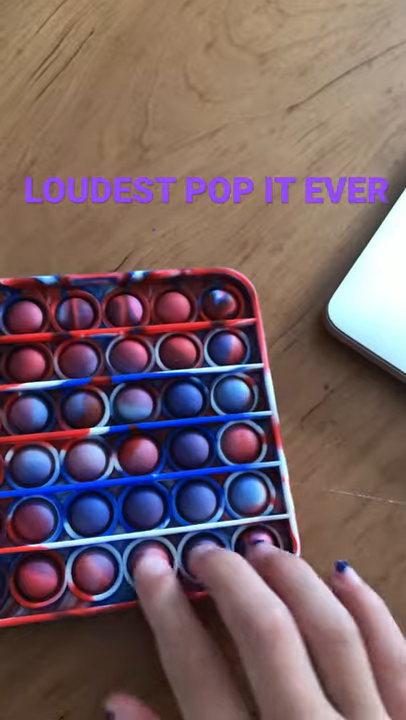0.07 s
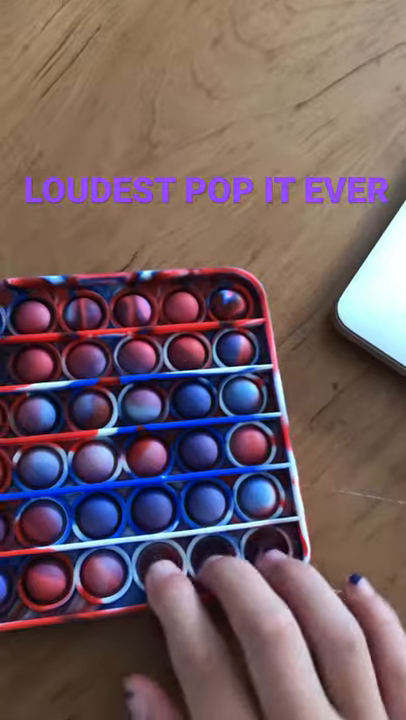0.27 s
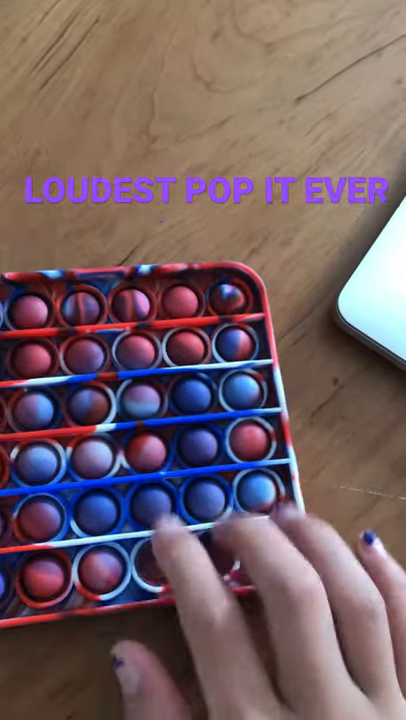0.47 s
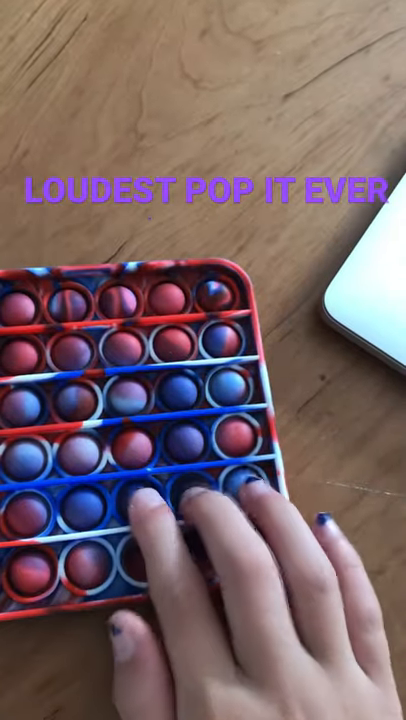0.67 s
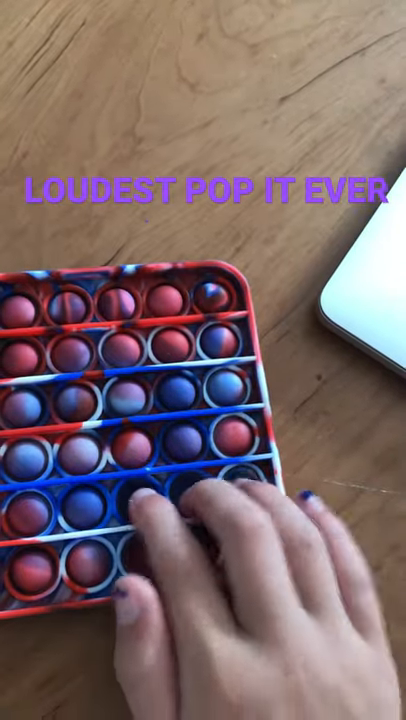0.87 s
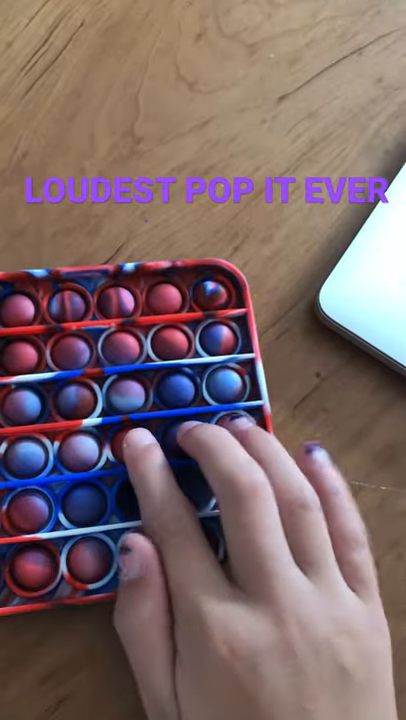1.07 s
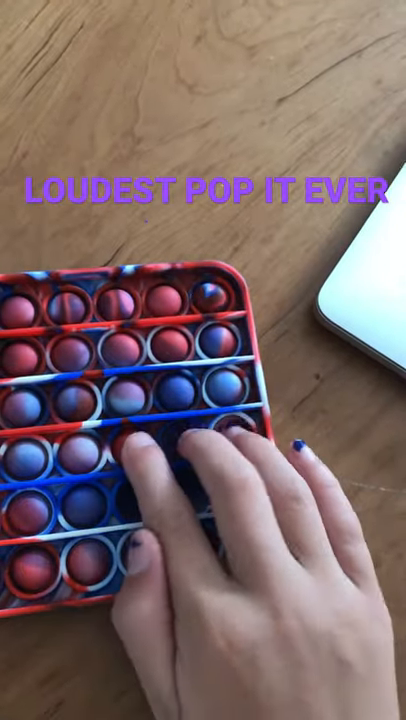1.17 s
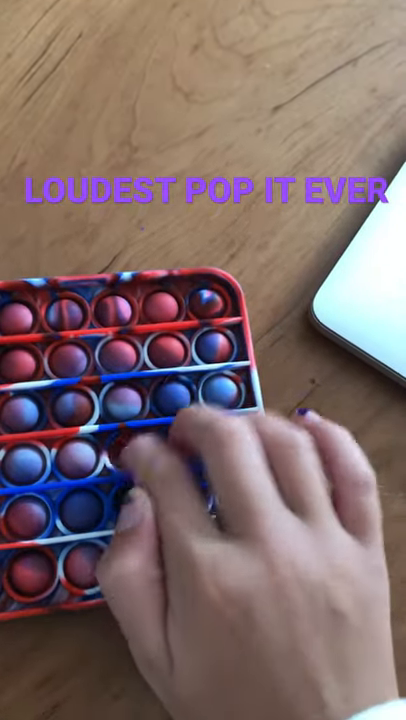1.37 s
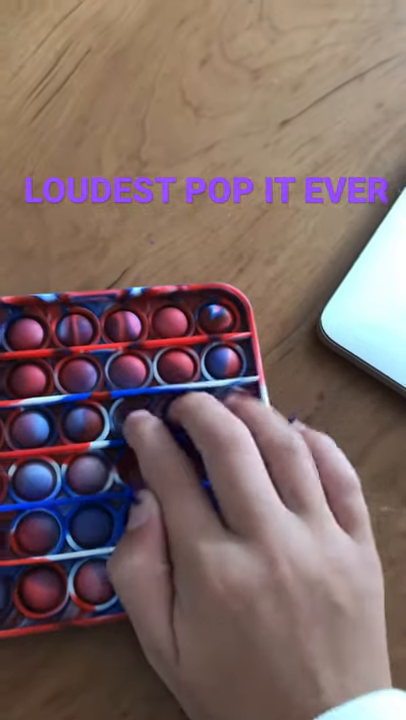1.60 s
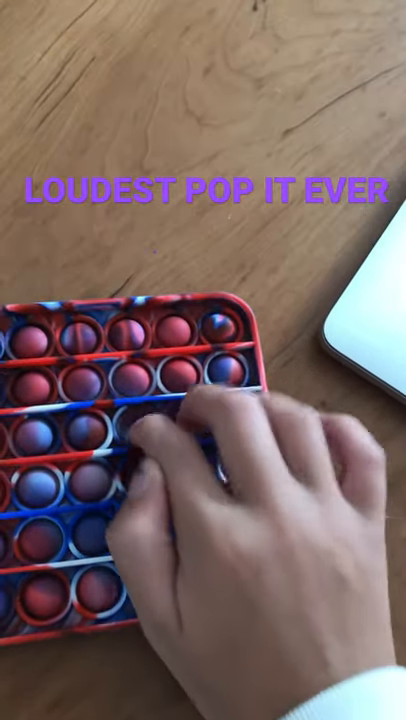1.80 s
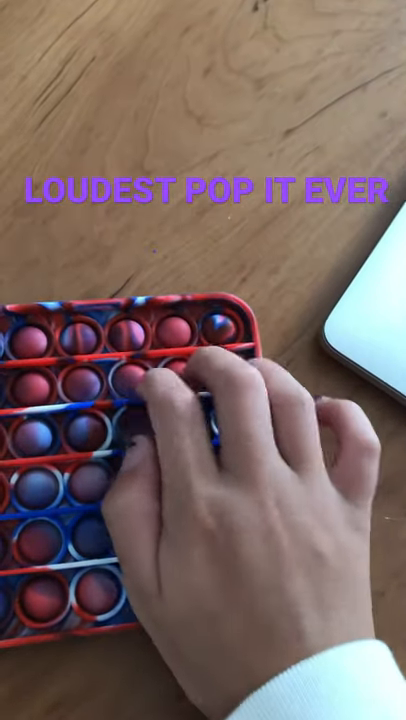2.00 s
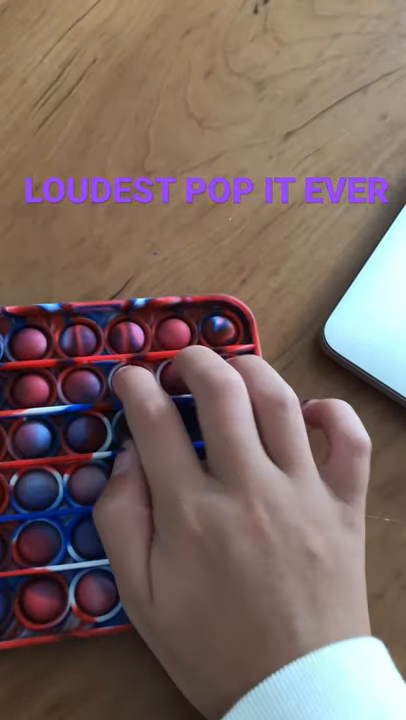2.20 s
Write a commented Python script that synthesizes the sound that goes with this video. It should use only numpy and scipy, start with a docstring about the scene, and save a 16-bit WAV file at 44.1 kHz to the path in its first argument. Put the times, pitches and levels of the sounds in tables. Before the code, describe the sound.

A silicone bubble toy pops sharply as fingers press it on a wooden desk, in four quick clusters with soft fingertip touches between. The microphone is close, and each cluster rings briefly in a small quiet room.

```python
"""A faint hum in a small quiet room, then fingers popping a silicone bubble toy row by row on a wooden
desk, close to the microphone. Each dome snaps through: a click of its skin, a short ring of the air in
its cup and a thump of the sheet. Fingertips touch and rub softly between rows; the room rings on behind."""
import sys
import numpy as np
from scipy import signal
from scipy.fft import rfft, irfft
from scipy.io import wavfile

SR = 44100
rng = np.random.default_rng(int(sys.argv[2]) if len(sys.argv) > 2 else 0)


def to_wav(s):
    """Save 16-bit WAV."""
    ch = np.atleast_2d(s).T  # columns
    pcm = np.round(np.clip(ch, -1, 1) * 32767)  # PCM
    wavfile.write(sys.argv[1], SR, pcm.astype(np.int16))


N = 99225
T = np.arange(N) / SR


def from_db(db):
    """Decibels to gain."""
    return 10 ** (np.asarray(db) / 20)


def unit_rms(x):
    """Scale to unit power."""
    return x / np.sqrt(np.mean(x ** 2) + 1e-20)


def butter(x, hz, kind, order=2):
    """Butterworth low-pass or high-pass."""
    return signal.sosfilt(signal.butter(order, np.clip(hz, 1, .45 * SR), kind, fs=SR, output="sos"), x)


def resonance(x, hz, width_hz):
    """Damped resonance with gain 1 at its peak."""
    r = np.exp(-np.pi * width_hz / SR)
    feedback = [1, -2 * r * np.cos(2 * np.pi * hz / SR), r * r]
    return signal.lfilter(np.array([1, 0, -1]) * (1 - r * r) / 2, feedback, x + 1e-18)


def modes(x, table, pitch=1):
    """Parallel resonances of alternating sign."""
    return sum((-1) ** k * from_db(db) * resonance(x, pitch * multiple, width_hz)
               for k, (multiple, db, width_hz) in enumerate(table))


def notch(x, hz, width_hz, depth):
    """Cancel a share of one band."""
    return x - depth * resonance(x, hz, width_hz)


def at_hz(table, hz, column=1):
    """Read one column of a table on a log-frequency axis."""
    table = np.array(table)
    return np.interp(np.log(hz + 1e-9), np.log(table[:, 0]), table[:, column])


def add(out, start, sound):
    """Mix a sound in at a start time in seconds."""
    i = int(start * SR)
    out[i:i + len(sound)] += sound[:max(N - i, 0)]


def room_tone():
    """Still air and a low, wavering hum."""
    # The air's spectrum. Each row: frequency in Hz, relative density in dB.
    air_spectrum = [(25, -25), (48, 6), (80, -10), (200, -1.5), (400, -12.5), (1000, -15), (2500, -22),
                    (6000, -28.5), (10000, -33.5), (15000, -33)]
    # The hum's tones. Each row: frequency in Hz, level in dB.
    hum_tones = [(47.5, -66.5), (120, -66.5), (240, -71.5)]
    air_db, waver_depth, waver_hz = -57.5, 0.59, 6
    white = rfft(rng.standard_normal(N))
    colour = from_db(at_hz(air_spectrum, np.arange(len(white)) * SR / N))
    out = from_db(air_db) * unit_rms(irfft(white * colour, N))
    for hz, db in hum_tones:
        waver = unit_rms(butter(rng.standard_normal(N + SR), waver_hz, "low")[SR:])
        tone = np.sin(2 * np.pi * (hz * T + rng.random()))
        out += from_db(db) * unit_rms((1 + waver_depth * waver) * tone)
    return out


def fingertips():
    """Skin on silicone: touches start at once and die away; brushes swell and fade."""
    # A fingertip lands or slides. Each row: start in seconds, level in dB, decay in seconds, centre in Hz.
    touches = [(0.167, -35, .002, 4170), (0.608, -53.5, 0.0046, 1300), (.622, -47.5, 0.0033, 890),
               (1.066, -50, 0.027, 500), (1.511, -48, 0.0067, 1500), (1.513, -47.5, 0.0089, 447),
               (1.965, -49, .01, 900), (1.986, -51.5, 0.017, 453)]
    # Skin brushes the toy. Each row: start in seconds, level in dB, length in seconds, centre in Hz.
    brushes = [(0.144, -56, 0.095, 3960), (0.612, -64.5, 0.089, 4000), (1.53, -69, .045, 6000),
               (1.965, -59, .08, 380)]
    width = 1.17   # times the centre frequency
    out = np.zeros(N)
    for start, db, decay, hz in touches:
        age = T[:SR // 5] / decay
        envelope = np.minimum(10 * age, 1) * np.exp(-age)
        rub = resonance(rng.standard_normal(len(age)), hz, hz * width)
        add(out, start, from_db(db) * envelope * unit_rms(butter(rub, 3 * hz, "low")))
    for start, db, length, hz in brushes:
        swell = np.sin(np.pi * np.clip((T - start) / length, 0, 1))
        out += from_db(db) * swell * unit_rms(resonance(rng.standard_normal(N), hz, hz * width))
    return out


def dome_pop(cup_db, cup_hz, thump_db, thump_hz, skin_db, skin_hz, rim_db, rim_hz,
             snap_db, snap_hz, crack_db, lower_hz, upper_hz):
    """One sudden flip rings the dome for a few milliseconds; two bands cancel and leave it hollow."""
    # Air in the cup. Each row: multiple of its pitch, gain in dB, width in Hz.
    cup_modes = [(.82, 1.5, 300), (1.0, 4.5, 386), (1.33, 0, 456)]
    # The stretched skin. Each row: multiple of its pitch, gain in dB, width in Hz.
    skin_modes = [(.95, 2.5, 526), (1.17, 1.5, 566), (1.38, -6.5, 600)]
    # The thin top of the snap. Each row: frequency in Hz, gain in dB, width in Hz.
    crack_modes = [(9000, 1, 1300), (12700, -12, 3500)]
    silicone_top_hz, crackle_decay_s = 8530, .0006
    flip = signal.unit_impulse(SR // 20)
    flip = flip - 2 * resonance(flip, hz=4540, width_hz=1700)   # draws this band out a little
    cup = from_db(cup_db) * modes(flip, cup_modes, cup_hz)
    skin = from_db(skin_db) * modes(flip, skin_modes, skin_hz)
    thump = from_db(thump_db) * resonance(flip, thump_hz, width_hz=270)
    sheet_flex = from_db(thump_db - 5.5) * resonance(flip, hz=214.5, width_hz=150)
    rim = from_db(rim_db) * resonance(flip, rim_hz, width_hz=650)
    snap = from_db(snap_db) * resonance(flip, snap_hz, width_hz=1000)
    crackle = from_db(-17) * rng.choice([-1, 1], len(flip)) * np.exp(-T[:len(flip)] / crackle_decay_s)
    crack = from_db(crack_db) * butter(modes(flip + crackle, crack_modes), silicone_top_hz, "high")
    body = thump - sheet_flex + cup - skin - rim + snap
    dome = butter(body, silicone_top_hz, "low", order=6) + crack
    for hz in (lower_hz, upper_hz):
        dome = notch(dome, hz, width_hz=0.13 * hz, depth=0.89)
    return butter(dome, 130, "high")


def popping_rows():
    """The domes snap through in turn, their sound scattering off the hand and the desk."""
    # Each row: start in seconds; gain in dB and frequency in Hz for cup, thump, skin, rim and snap;
    # crack gain in dB; lower and upper hollow in Hz.
    presses = [ (0.2172, 26, 1150, -1, 515, 11.5, 2470, 18, 3760, 10.5, 6070, -8, 700, 3030),
               (0.2192, 22.5, 1060, 12.5, 510, 17, 2230, 15.5, 4000, 12.5, 5540, -6, 680, 7700),
               (0.2429, 23.5, 955, 9, 330, 18.5, 2280, 18, 3795, 7, 6500, -7.5, 586, 4700),
               (0.694, 24, 1044, 18, 470, 18, 2190, 19, 3920, 7, 6340, -5, 694, 5160),
               (0.7582, 25, 1010, 14.5, 400, 19, 2140, 19, 3770, 3.5, 6240, -11, 644, 2960),
               (0.8102, 9, 854, 9, 318, -1.5, 1970, -10, 3000, -31, 5500, -27, 496, 1370),
               (0.8276, 23.5, 870, 14, 420, 16.5, 2446, 17, 4500, 12, 5930, 2, 1830, 3430),
               (1.1580, 20, 1000, 18, 519, 21.5, 2320, 17, 4100, 10.5, 5470, -12.5, 1760, 6300),
               (1.1663, 24, 900, 16, 520, 11.5, 2650, 14, 4350, 15.5, 6060, -1, 2100, 6700),
               (1.2158, 24.5, 966, 15, 440, 17.5, 2200, 15.5, 3800, 9, 6440, -11.5, 636, 5600),
               (1.6212, 25.5, 1030, 14.5, 470, 19, 2085, 16.5, 3660, 7.5, 5850, -10.5, 680, 4500),
               (1.6294, 10.5, 1000, -2.5, 460, -18, 2300, -17, 3700, -30, 5900, -39, 680, 4500),
               (1.6570, 12, 850, 4, 457, -12, 2050, -16, 3500, -34, 5900, -26, 520, 4500),
               (1.6637, 18.5, 960, 15, 560, 12, 2300, 13.5, 4170, 16.5, 6770, -1, 1070, 3320),
               (1.6707, 21, 934, 14, 560, 6.5, 2770, 7, 4670, 8, 6570, 4.5, 2130, 7800)]
    scatter_db, scatter_t60_s, scatter_delay_s = -16.5, .02, 0.00193
    direct = np.zeros(N)
    for start, *dome in presses:
        add(direct, start, dome_pop(*dome))
    t = T[:SR // 20]
    scatter = rng.standard_normal(len(t)) * from_db(-60 * t / scatter_t60_s) * (t > scatter_delay_s)
    scatter /= np.linalg.norm(scatter)
    return direct + from_db(scatter_db) * signal.fftconvolve(direct, scatter)[:N]


def room_ring(x):
    """The small room answers with a diffuse ring that dies band by band."""
    # The room's ring. Each row: frequency in Hz, gain in dB, seconds to fall by 60 dB.
    ring_bands = [(153, -8.5, 0.21), (400, -12, 0.51), (1000, -14.5, 0.51), (1600, -16.5, 0.61),
                  (2500, -19.5, 0.6), (4000, -18.5, 0.58), (6200, -17, .56), (8600, -21.5, 0.55),
                  (14900, -24.5, .3)]
    delay_s, build_s = 0.0034, 0.01
    t, ring = T[:SR], 0
    white, hz = rfft(rng.standard_normal(SR)), np.arange(SR // 2 + 1)
    onset = np.clip((t - delay_s) / build_s, 0, 1)
    edges_hz = np.geomspace(80, 18000, 17)
    for low, high in zip(edges_hz, edges_hz[1:]):
        centre = np.sqrt(low * high)
        band = irfft(white * (hz >= low) * (hz < high))
        envelope = onset * from_db(-60 * t / at_hz(ring_bands, centre, column=2))
        ring += from_db(at_hz(ring_bands, centre)) * band * envelope / np.linalg.norm(envelope)
    return signal.fftconvolve(x, ring)[:N]


def scene():
    """The toy close by, the room behind it, in mono."""
    toy = popping_rows() + fingertips()
    # The cup aims its ring at the microphone, so the room gets less of it.
    into_room = notch(toy, hz=1060, width_hz=400, depth=.35)
    return (toy + room_ring(into_room) + room_tone())[None]


def record(dry):
    """A brief silence, then a quick fade-in; the highest peaks are rounded and the very top is cut."""
    silence_s, fade_s, cutoff_hz = 0.037, 0.003, 17200
    x = dry * np.clip((T - silence_s) / fade_s, 0, 1)
    x = x / (1 + x ** 8) ** (1 / 8)
    x = notch(x, hz=10710, width_hz=660, depth=0.65)   # the microphone dips in the high treble
    return signal.sosfilt(signal.cheby2(16, 80, cutoff_hz, fs=SR, output="sos"), x)


dry = scene()
out = record(dry)
to_wav(out)
```